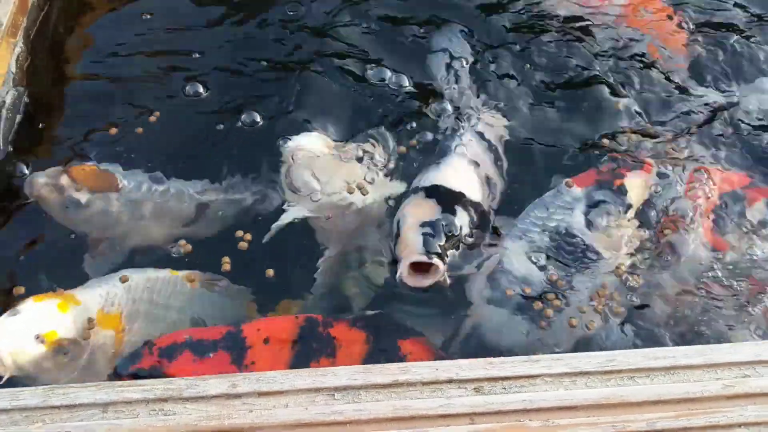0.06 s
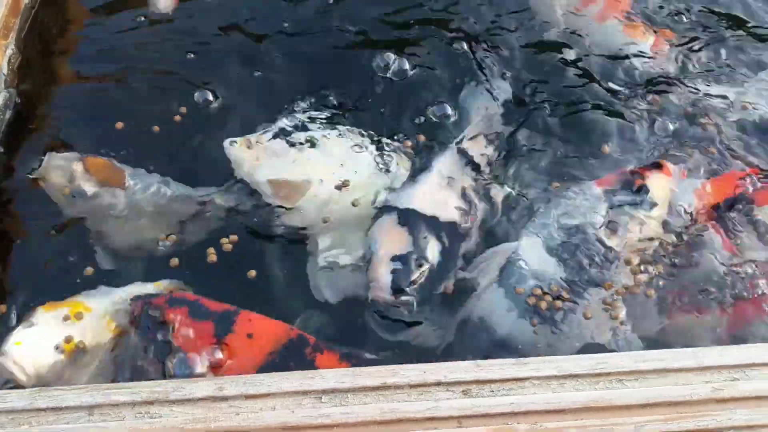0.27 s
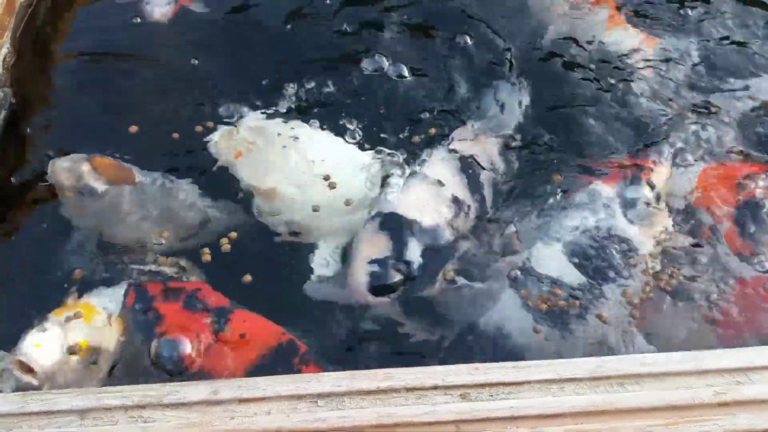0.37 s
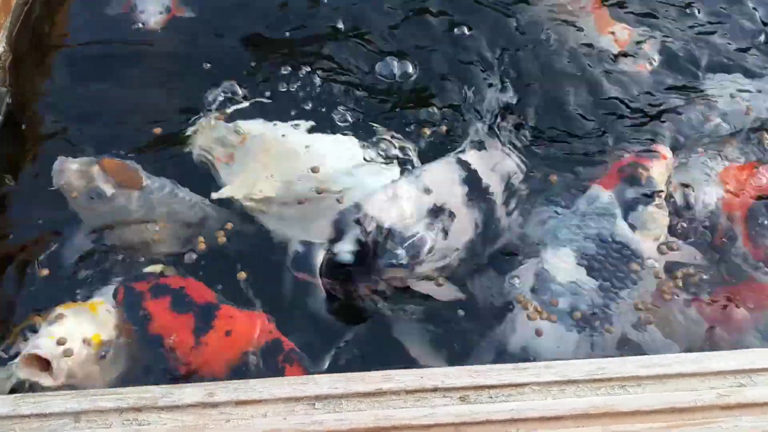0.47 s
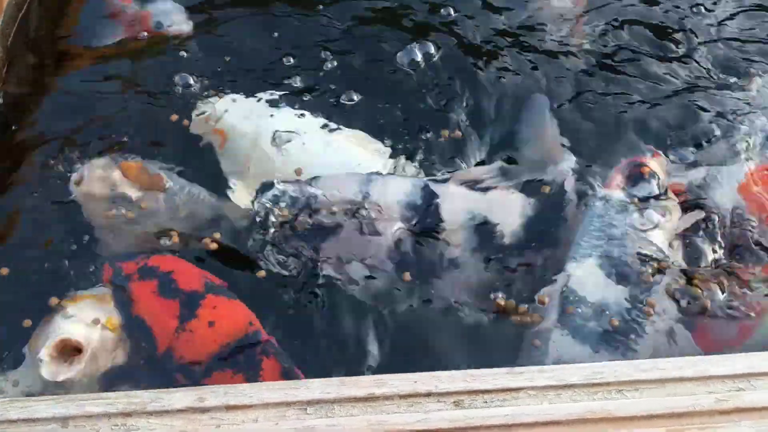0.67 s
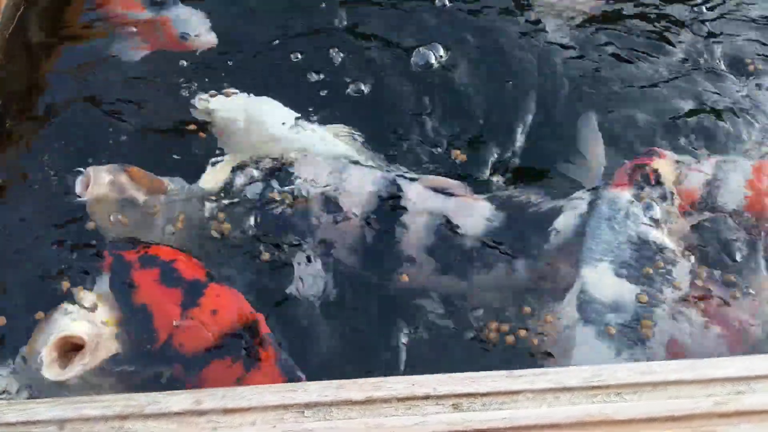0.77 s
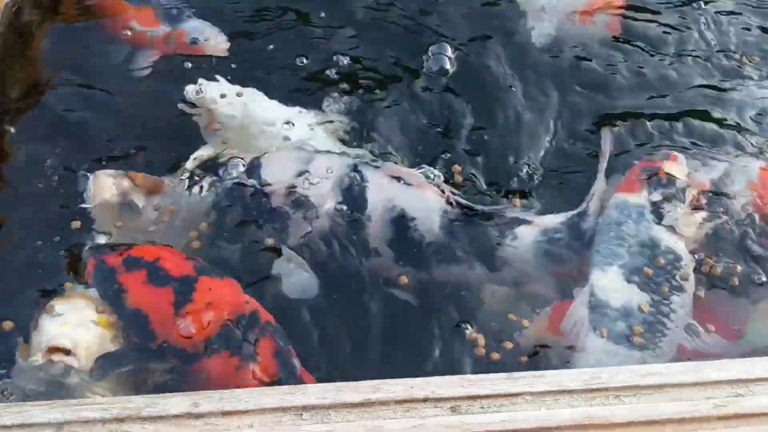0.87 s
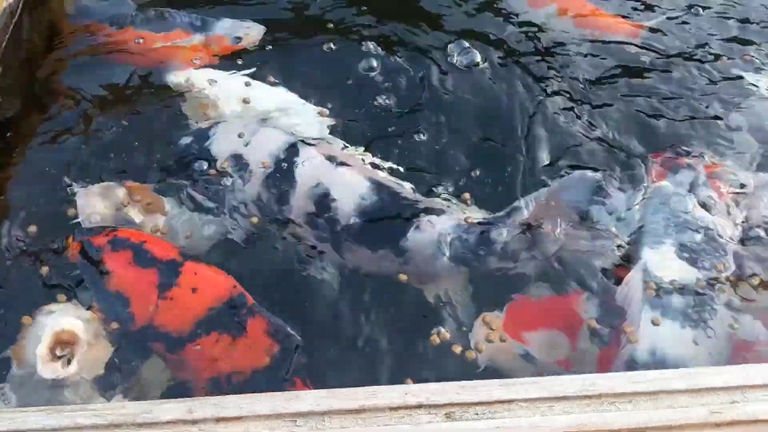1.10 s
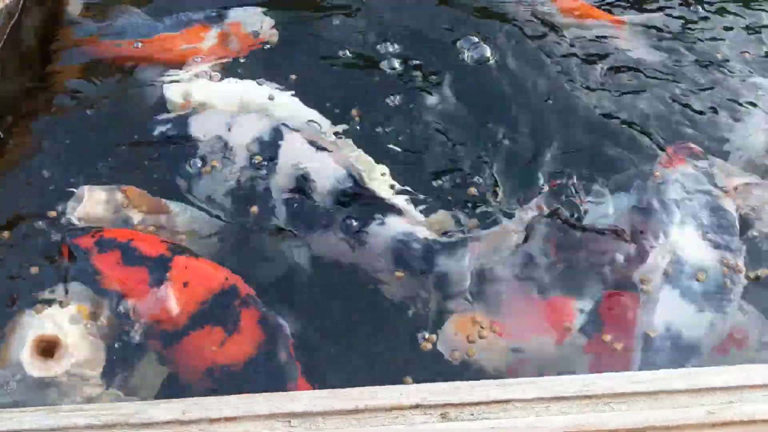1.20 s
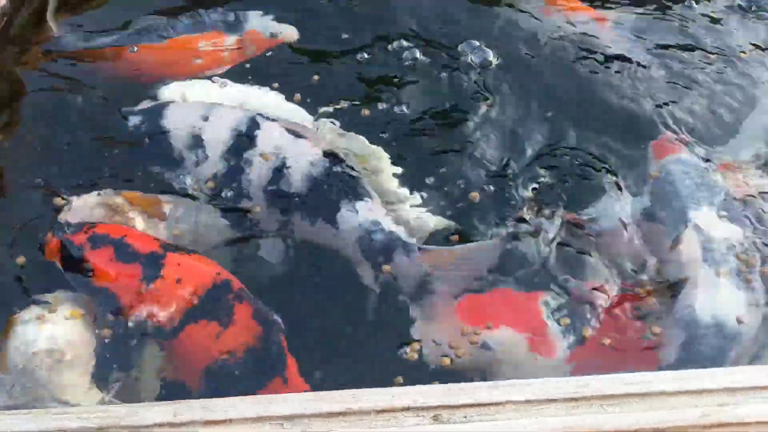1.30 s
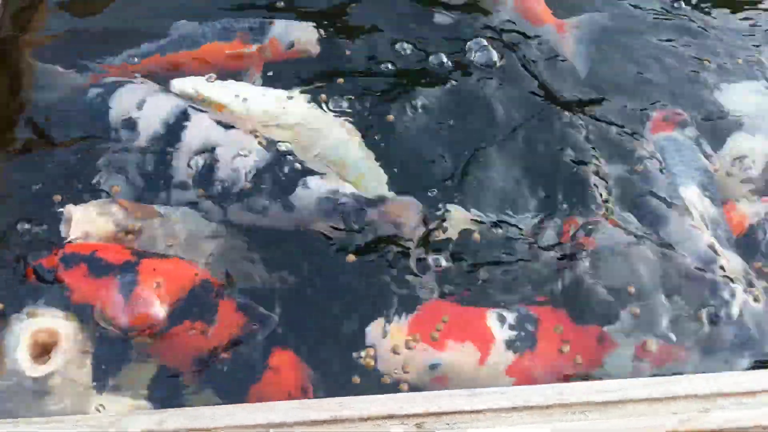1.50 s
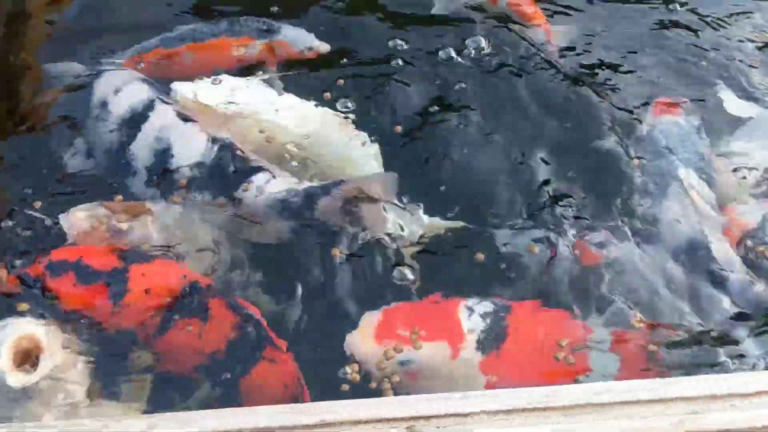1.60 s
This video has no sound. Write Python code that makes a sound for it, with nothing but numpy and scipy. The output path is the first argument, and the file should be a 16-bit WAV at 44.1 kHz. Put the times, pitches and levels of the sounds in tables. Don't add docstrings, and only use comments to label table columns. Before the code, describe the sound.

Wet gulping and plopping of feeding fish, with bubbles popping and tiny droplets ticking on water.

```python
import sys
import numpy as np
from scipy import signal
from scipy.fft import rfft, irfft
from scipy.io import wavfile
from scipy.ndimage import uniform_filter1d

SR = 44100
rng = np.random.default_rng(int(sys.argv[2]) if len(sys.argv) > 2 else 0)


def voltage_ratio(level):
    return 10 ** (np.asarray(level, float) / 20)


def master_out(mix):
    frames = np.transpose(np.atleast_2d(mix))
    ceiling = np.clip(frames, -1, 1)
    pcm = np.round(ceiling * 32767).astype(np.int16)
    wavfile.write(sys.argv[1], SR, pcm)


N = 72765


def smack():
    start_s, flap_s, jitter_s = 0.3285, 0.0021, 0.00025
    closed_hz, open_hz, mouth_top_hz = 1900, 2870, 3700
    out = np.zeros(N)
    for k in range(8):
        hz = closed_hz + (open_hz - closed_hz) * min(k / 4, 1)
        if k >= 5:
            hz *= 0.5
        db = -19 - (k - 2.1) ** 2
        flap = ring(db, hz, t60=0.0027, rise_s=0.0007, start=0.28, glide_s=0.00038)
        add(out, start_s + k * flap_s + jitter_s * np.sin(k * k), flap)

    gurgle_db, gurgle_t60 = -45.5, 0.091
    t = np.arange(0, gurgle_t60, 1 / SR)
    throat = resonate(rng.standard_normal(4410), closed_hz, 2000)
    gurgle = evened(resonate(throat, closed_hz, 2000))[:len(t)]
    fall = voltage_ratio(gurgle_db - 60 * np.maximum(t - 0.01, 0) / gurgle_t60)
    add(out, start_s, np.minimum(t / 0.029, 1) * fall * gurgle)
    return voltage_ratio(1.5) * signal.sosfilt(signal.butter(4, mouth_top_hz, fs=SR, output="sos"), out)


# start_s, peak_db, pitch_hz, t60_s
MOUTH_PLOPS = [(0.018, -39, 1343, 0.017), (0.0771, -41, 610, 0.012), (0.086, -50, 523, 0.034),
               (.2323, -29, 1900, 0.0063), (0.2417, -33, 510, 0.0078), (.275, -48, 1860, 0.034),
               (0.296, -41.5, 670, 0.0081), (0.325, -32, 1800, 0.0056), (0.396, -45, 1440, 0.045),
               (.404, -45, 2110, .05), (0.412, -35.5, 1943, 0.033), (.467, -48, 648, 0.036),
               (.552, -44.5, 1300, 0.023), (0.584, -45.5, 1450, 0.038), (.607, -40, 2020, 0.019),
               (.618, -39.5, 1860, 0.021), (.699, -40, 538, 0.019), (0.771, -43, 1420, 0.026),
               (.785, -40.5, 1900, 0.023), (0.822, -48.5, 644, 0.013), (.955, -49, 587, 0.035),
               (1.04, -46.5, 305, 0.06), (1.065, -38.5, 1750, 0.0079), (1.094, -30.5, 1040, 0.01),
               (1.149, -47.5, 580, 0.051), (1.263, -38, 2690, 0.013), (1.387, -44.5, 466, 0.032),
               (1.544, -41, 700, 0.016),
               (.977, -51, 280, 0.033),
    (1.001, -53, 460, 0.015),
    (1.066, -50.5, 960, 0.03),
    (1.2, -51, 300, 0.026),
    (1.487, -49, 2300, .02),
    (1.601, -48.5, 530, 0.0091),
    (.32, -43, 1140, 0.027),
    (1.097, -44, 1680, 0.01),
    (.382, -49, 280, 0.054),
]


def mouth_plops():
    out = np.zeros(N)
    for s, db, hz, t60 in MOUTH_PLOPS:
        add(out, s, ring(db, hz, t60, rise_s=0.00036, start=0.87, glide_s=0.0031))
    return out


# start_s, peak_db, final_hz, t60_s, start_share (of final_hz)
SLIDING_POCKETS = [
    (.308, -30.5, 1350, .012, .65),
    (.3848, -43, 5200, .01, .7),
    (.553, -48, 3900, .014, 1.3),
    (.7524, -26.5, 1750, .016, .55),
    (1.271, -47, 2300, .012, .9),
    (1.276, -54, 2650, .06, .95),
    (1.315, -57, 2050, .02, .95),
    (1.323, -53, 2000, .02, .95),
    (1.362, -57, 1900, .03, .95),
    (1.363, -57, 2800, .03, .95),
]


def chirps():
    out = np.zeros(N)
    for s, db, hz, t60, start in SLIDING_POCKETS:
        add(out, s, ring(db, hz, t60, rise_s=0.00097, start=start, glide_s=0.0029))
    return out


# start_s, peak_db, start_hz, end_hz, length_s
RISING_BUBBLES = [(0.033, -57, 883, 2073, 0.042), (0.052, -55, 580, 950, 0.026),
                  (0.239, -42, 803, 1390, 0.033), (0.361, -51.5, 775, 1290, 0.017),
                  (.415, -48, 630, 1304, 0.036), (0.479, -68, 543, 900, 0.02),
                  (.517, -42, 820, 1140, 0.019), (0.614, -46, 610, 1550, 0.064),
                  (.684, -30.5, 976, 1130, 0.008), (0.692, -44.5, 1045, 1926, 0.044),
                  (0.706, -45.5, 693, 1133, 0.0488), (0.893, -58.5, 803, 2520, 0.04),
                  (1.106, -52, 702, 946, 0.031), (1.151, -58, 616, 2090, 0.047),
                  (1.154, -67, 1180, 1760, 0.016), (1.234, -47.5, 680, 777, 0.021),
                  (1.256, -52.5, 790, 1250, 0.022), (1.306, -43, 325, 592, 0.029),
                  (1.327, -47, 557, 1100, 0.018), (1.353, -34, 650, 1297, 0.045),
                  (1.396, -60, 1270, 2550, 0.036), (1.439, -68, 488, 1314, 0.045)]


def rising_bubbles():
    out = np.zeros(N)
    for s, db, hz, end_hz, length in RISING_BUBBLES:
        add(out, s, bubble(db, hz, end_hz, length))
    return out


def bubble(db, hz, end_hz, length):
    rise_s, settle_s, tail_db, bend, rough_db = 0.0014, 0.024, -58.5, 1.2, 2.0
    t = np.arange(0, length, 1 / SR)
    edge = np.minimum(t / rise_s, 1) * np.minimum((1 - t / length) * 6, 1)
    pitch = hz * (end_hz / hz) ** ((t / length) ** bend)
    turns = np.cumsum(pitch) / SR
    level = tail_db + (db - tail_db) * np.exp(-t / settle_s)
    rough = rough_db * drift(4410, size=150)[:len(t)]
    return edge * voltage_ratio(level + rough) * np.sin(2 * np.pi * turns)


# start_s, peak_db, t60_s
BURSTING_BUBBLES = [(.0385, -58, .008), (0.2133, -44.5, .008), (0.232, -43.5, .008), (.272, -58, .008),
                    (.5525, -46, .01), (.566, -54, .01), (.6015, -52, .006), (.684, -48.5, .006),
                    (0.7476, -56, .005), (.7705, -48, 0.0065), (.7843, -41.5, 0.0054), (0.81, -48.5, 0.009),
                    (.8655, -58, .006), (.9035, -48, .005), (.954, -47, .008), (0.997, -54, 0.014),
                    (1.0643, -53, .008), (1.0795, -55, .008), (1.1094, -45.5, .008), (1.1285, -51, .008),
                    (1.1912, -52, .008), (1.2625, -53, .008), (1.2928, -48.5, 0.011), (1.5097, -53, 0.0067)]


def burst_snaps():
    out = np.zeros(N)
    for s, db, t60 in BURSTING_BUBBLES:
        add(out, s, snap(db, t60))
    return out


def snap(db, t60):
    t = np.arange(0, t60, 1 / SR)
    band = signal.butter(1, [1800, 11500], "band", fs=SR, output="sos")
    noise = signal.sosfilt(band, rng.standard_normal(882))
    return voltage_ratio(db - 60 * t / t60)[:882] * noise[:len(t)]


# start_s, peak_db, pitch_hz, twice_t60_s (halved when rung)
NEAR_DROPLETS = [(0.037, -49, 5160, 0.022), (.039, -43.5, 8860, 0.018), (.2095, -25.5, 3690, 0.008),
                 (.214, -44, 4600, 0.0049), (.232, -37.5, 4240, 0.0054), (.493, -48.5, 9100, 0.013),
                 (.591, -31, 9530, 0.0079), (.591, -37.5, 7100, 0.011), (0.663, -48.5, 8000, .015),
                 (.684, -46, 4100, 0.0033), (.732, -50, 4430, 0.013), (0.752, -49.5, 4240, .015),
                 (.77, -43.5, 4660, 0.017), (.777, -46, 4000, 0.021), (.784, -49, 5630, 0.0071),
                 (.81, -49, 9400, 0.0081), (0.904, -32.5, 10060, 0.0066), (0.905, -48, 6640, 0.017),
                 (.949, -51.5, 6450, 0.015), (1.062, -58.5, 4740, 0.017), (1.11, -45, 7130, 0.0097),
                 (1.129, -50, 6340, 0.01), (1.139, -37, 11600, 0.011), (1.294, -47.5, 4130, 0.045),
                 (1.348, -49.5, 9100, 0.016), (1.51, -41.5, 4410, 0.0065), (1.627, -50, 14500, 0.009),
                 (1.477, -52, 2100, .03), (1.095, -60, 4000, 0.035)]
# start_s, peak_db, pitch_hz
FAR_DROPLETS = [(.03, -57, 4830), (.121, -56.5, 4200), (.124, -56, 9960), (.233, -48.5, 9120),
                (0.3813, -49, 3200), (0.401, -64, 6590), (0.448, -61, 4710), (0.5408, -55, 5800),
                (.549, -55, 8000), (.632, -55, 9200), (.677, -54, 9200), (.681, -53.5, 3800),
                (.722, -55, 6100), (.789, -52, 9700), (.8925, -52, 9290), (0.9043, -51, 4700),
                (.963, -52, 9040), (.968, -52, 10400), (1.001, -56.5, 6530), (1.018, -58, 3900),
                (1.0834, -60, 4930), (1.1204, -57, 3100), (1.237, -57.5, 4310), (1.257, -54, 7400),
                (1.293, -47.5, 4900), (1.301, -58, 9700), (1.3242, -55, 4820), (1.329, -55.5, 4080),
                (1.4376, -59, 5120), (1.4658, -51.5, 4950), (1.527, -53.5, 7930), (1.539, -59.5, 3800)]


def droplets():
    rise_s, click_db = 0.0004, -23
    out = np.zeros(N)
    for s, db, hz, t60 in NEAR_DROPLETS:
        add(out, s, ring(db, hz, t60 / 2, rise_s, start=0.94, glide_s=0.00074))
        click = voltage_ratio(db + click_db - np.arange(60) * 0.5) * rng.standard_normal(60)
        add(out, s, hz / 5000 * click)
    for s, db, hz in FAR_DROPLETS:
        add(out, s, ring(db, hz, t60=0.0098, rise_s=rise_s, start=0.97, glide_s=0.00088))
    return out


# start_s, level_db, length_s
FINE_SPRAY = [
    (.248, -60, 0.015),
    (0.33, -54, 0.032),
    (0.542, -66.5, 0.059),
    (.607, -46.5, 0.02),
    (.628, -64, .05),
    (0.772, -62.5, 0.03),
    (0.953, -60.5, 0.024),
    (1.102, -65, 0.04),
    (1.46, -68, 0.047),
]
# start_s, level_db, length_s
MOUTH_FROTH = [
    (.21, -55, 0.019),
    (.234, -55, 0.019),
    (.338, -51, 0.023),
    (.955, -61, .03),
    (1.095, -59.5, 0.044),
    (1.262, -60.5, 0.031),
    (1.474, -60.5, 0.032),
]


def spray():
    fizz = grains(per_s=2400, low_hz=4200, high_hz=13000, tilt_db=5.0, spread_db=5.0, cycles=26,
                  level=bursts(FINE_SPRAY))
    froth = grains(per_s=1200, low_hz=1300, high_hz=4500, tilt_db=0, spread_db=5.0, cycles=18,
                   level=bursts(MOUTH_FROTH))
    return fizz + froth


# start_s, level_db
WATER_STIR = [
    (0.0, -66),
    (0.458, -60.5),
    (1.65, -69),
]
# pitch_hz, level_db (per Hz)
WASH_SPECTRUM = [(300, -9.5), (1000, 1), (3000, -9.5), (10000, -28)]


def stirred_water():
    s, db = np.transpose(WATER_STIR)
    level = voltage_ratio(np.interp(np.arange(N) / SR, s, db))
    bubbles = grains(per_s=350, low_hz=348.4, high_hz=3540, tilt_db=0.5, spread_db=3.0, cycles=18, level=level)
    crackle = grains(per_s=300, low_hz=4200, high_hz=10800, tilt_db=5.0, spread_db=5.0, cycles=26, level=level)
    clumps = voltage_ratio(-16 + 4.0 * drift(N, size=700))
    wash = voltage_ratio(-3.5 + 2.0 * drift(N, size=900)) * level * coloured(WASH_SPECTRUM)
    return voltage_ratio(-4.5) * bubbles + clumps * crackle + wash


def pond_echo(mix):
    echo_db, echo_t60 = -20, 0.05
    t = np.arange(4410) / SR
    signs = rng.choice([-1., 1.], len(t))
    sparse = (rng.random(len(t)) < 0.05) * (t > 0.003)
    taps = signs * sparse * voltage_ratio(-60 * t / echo_t60)
    return mix + voltage_ratio(echo_db) * signal.oaconvolve(mix, taps / np.linalg.norm(taps))[:N]


# pitch_hz, width_hz, level_db
HOUSING = [
    (4400, 900, -6),
    (6400, 500, 1.5),
    (9300, 800, 5),
]


def microphone(mix):
    top_hz, leak_db = 10800, -9
    mix = mix + sum(voltage_ratio(db) * resonate(mix, hz, width) for hz, width, db in HOUSING)
    dull = signal.sosfilt(signal.butter(4, top_hz, fs=SR, output="sos"), mix)
    return dull + voltage_ratio(leak_db) * (mix - dull)


# pitch_hz, level_db (per Hz)
AIR_SPECTRUM = [(38, -40), (48, -1.5), (100, -3.5), (130, 0), (300, -9.5), (1200, -16.5), (3000, -28.5),
                (10000, -24.5), (12500, -33), (15900, -36.5)]
# pitch_hz, drift_hz, level_db
PUMP_HUM = [
    (50, 8.75, -64.5),
    (90.5, 6.7, -65),
]


def background():
    out = voltage_ratio(-65.5) * coloured(AIR_SPECTRUM)
    for hz, drift_hz, db in PUMP_HUM:
        turns = np.cumsum(hz + drift_hz * drift(N, size=1200)) / SR
        out += voltage_ratio(db + 3 + 2.0 * drift(N, size=1500)) * np.sin(2 * np.pi * turns)
    return out


def ring(db, hz, t60, rise_s, start, glide_s):
    t = np.arange(0, t60 + rise_s, 1 / SR)
    turns = np.cumsum(hz * (1 - (1 - start) * np.exp(-t / glide_s))) / SR
    fall = voltage_ratio(db - 60 * np.maximum(t - rise_s, 0) / t60)
    return fall * np.minimum(t / rise_s, 1) * np.sin(2 * np.pi * turns)


def grains(per_s, low_hz, high_hz, tilt_db, spread_db, cycles, level):
    out, power = np.zeros(N), 0
    pitches = np.geomspace(low_hz, high_hz, num=36)
    chance = per_s / len(pitches) / SR
    for hz in pitches:
        struck = rng.random(N) < chance
        sizes = voltage_ratio(spread_db * np.minimum(rng.exponential(1, N), 2))
        n = cycles * rng.uniform(0.5, 1.5)
        tilt = tilt_db * np.log2(hz / 1000)
        shape = ring(tilt, hz, t60=n / hz, rise_s=3 / hz, start=0.75, glide_s=4 / hz)
        out += signal.oaconvolve(sizes * struck * level, shape)[:N]
        power += np.mean(sizes ** 2) * chance * np.sum(shape ** 2)
    return out / np.sqrt(power)


def bursts(rows):
    t = np.arange(N) / SR
    return sum(voltage_ratio(db) * np.sin(np.pi * np.clip((t - s) / length, 0, 1) ** 0.44) for s, db, length in rows)


def resonate(x, hz, width):
    turn = np.exp(2j * np.pi * hz * np.arange(len(x)) / SR)
    r = np.exp(-np.pi * width / SR)
    return 2 * (turn * signal.lfilter([1 - r], [1, -r], x / turn)).real


def coloured(points):
    f, db = np.transpose(points)
    hz = np.fft.rfftfreq(N, 1 / SR)
    gain = voltage_ratio(np.interp(np.log(hz + 1), np.log(f), db, left=-90))
    return evened(irfft(rfft(rng.standard_normal(N)) * gain, N))


def drift(n, size):
    return evened(uniform_filter1d(uniform_filter1d(rng.standard_normal(n), size), size))


def evened(x):
    return x / np.sqrt(np.mean(x ** 2) + 1e-20)


def add(mix, s, sound):
    part = mix[round(s * SR):][:len(sound)]
    part += sound[:len(part)]


def scene():
    mouths = smack() + mouth_plops() + chirps()
    water = rising_bubbles() + burst_snaps() + droplets() + spray() + stirred_water()
    return (microphone(pond_echo(mouths + water)) + background())[None]


def low_pass(x):
    return signal.sosfilt(signal.butter(12, 16440, fs=SR, output="sos"), x)


def record(dry):
    edge = signal.firwin(255, 15950, window=("kaiser", 8), fs=SR)
    mix = signal.oaconvolve(dry, edge[None], "same")
    return low_pass(mix)


dry = scene()
out = record(dry)
master_out(out)
```